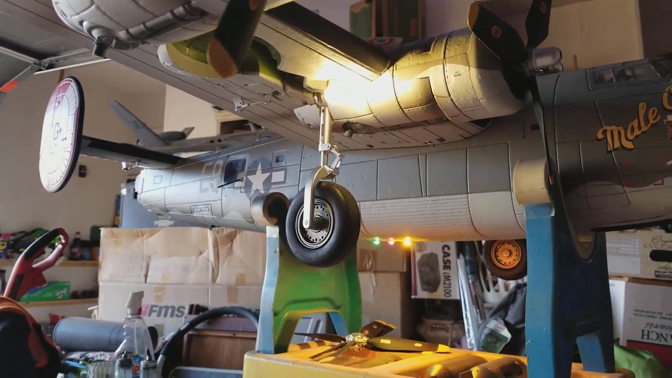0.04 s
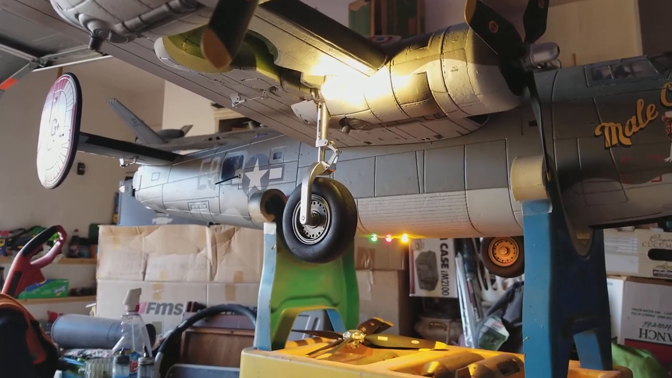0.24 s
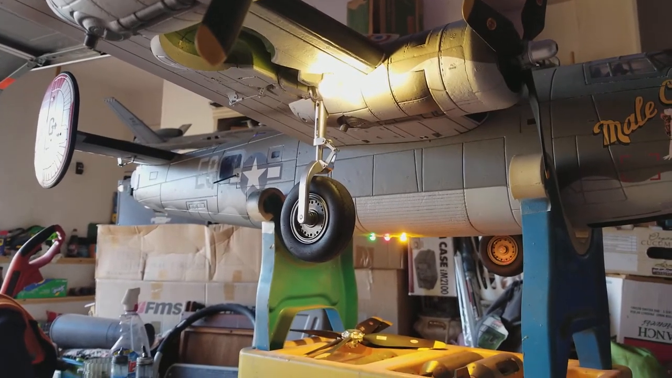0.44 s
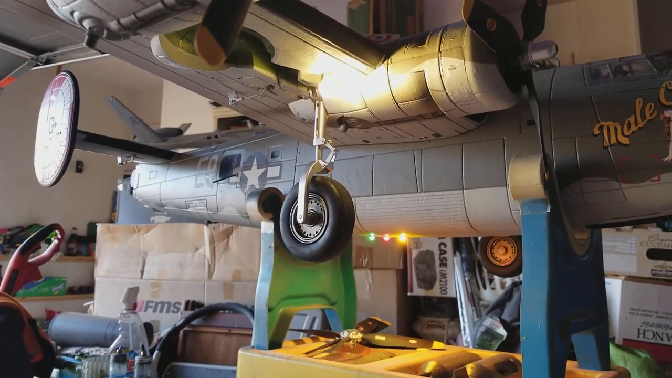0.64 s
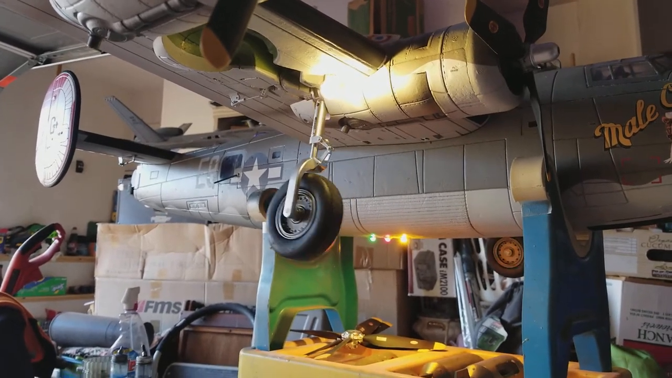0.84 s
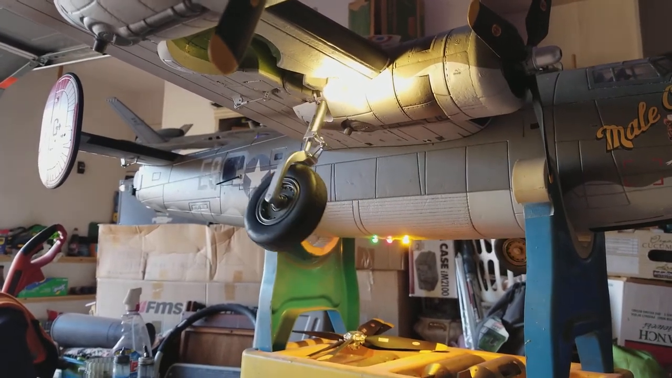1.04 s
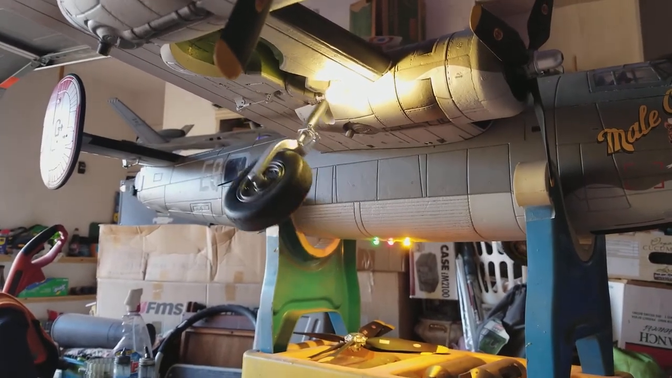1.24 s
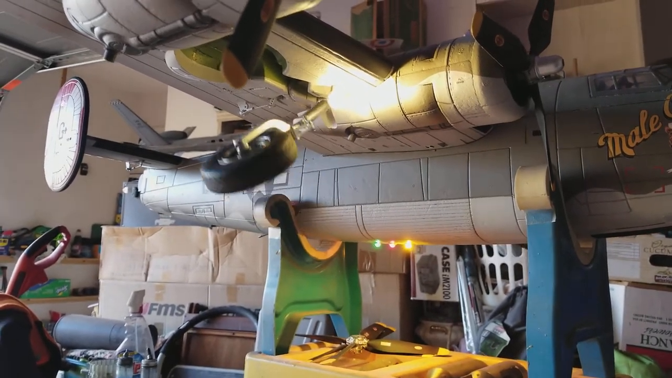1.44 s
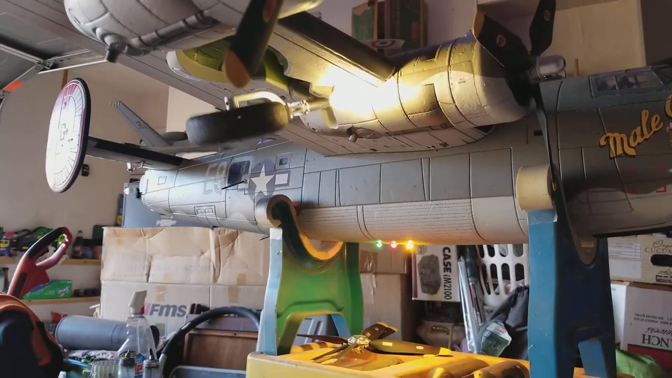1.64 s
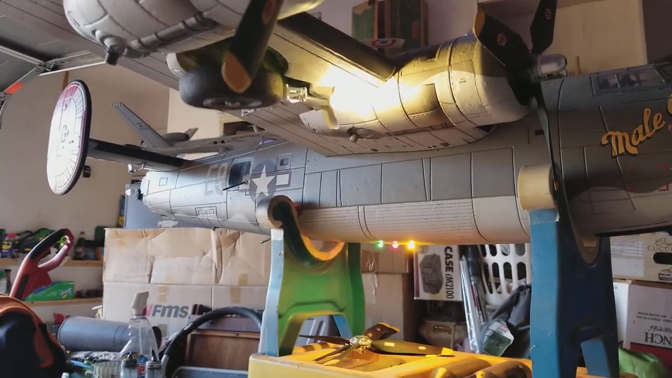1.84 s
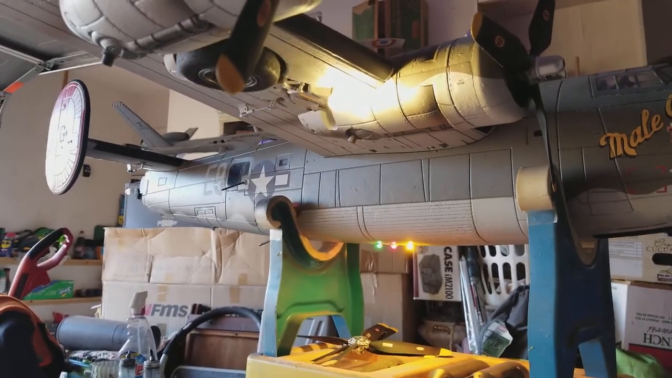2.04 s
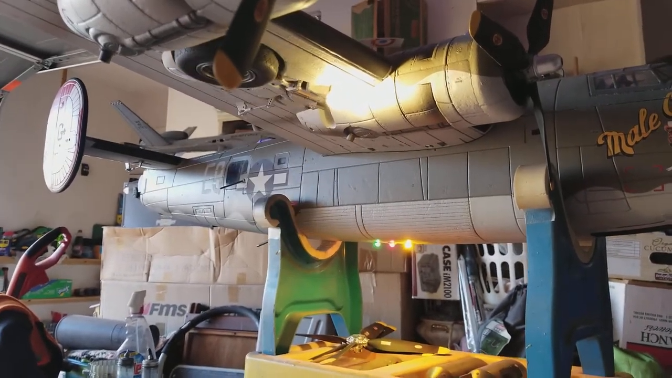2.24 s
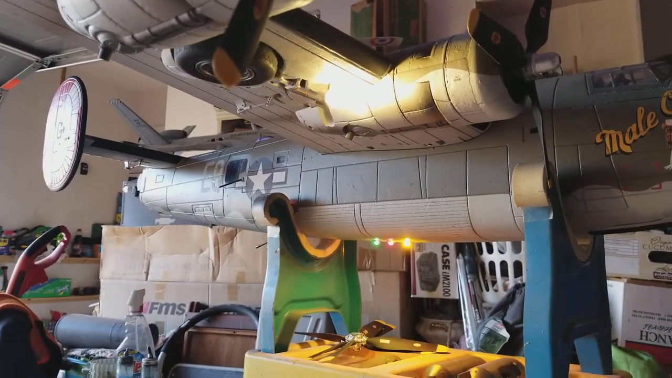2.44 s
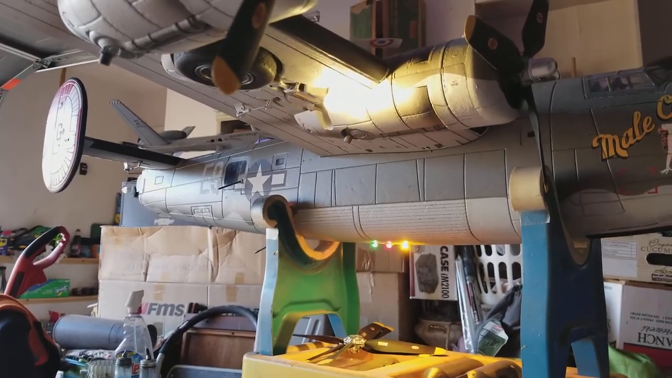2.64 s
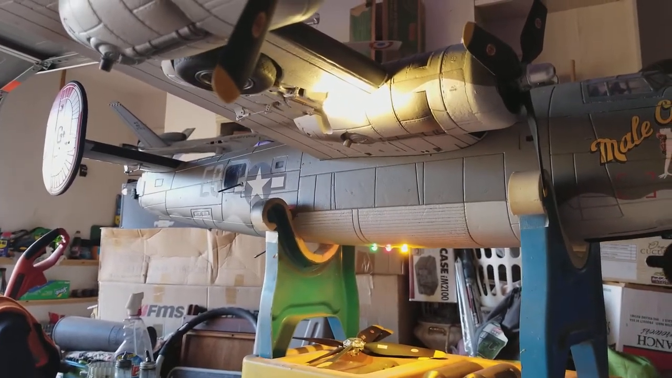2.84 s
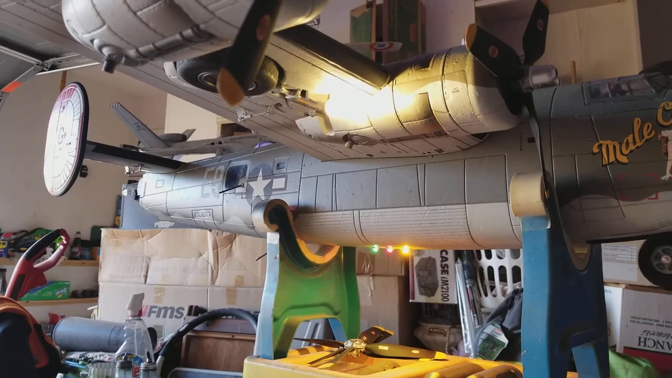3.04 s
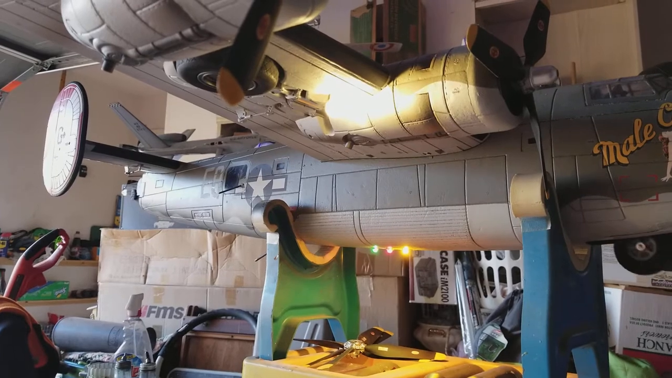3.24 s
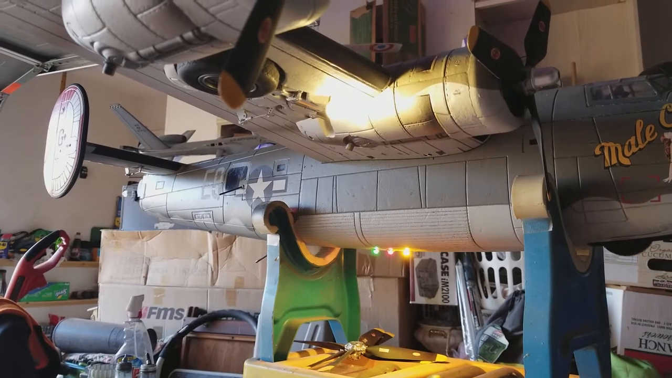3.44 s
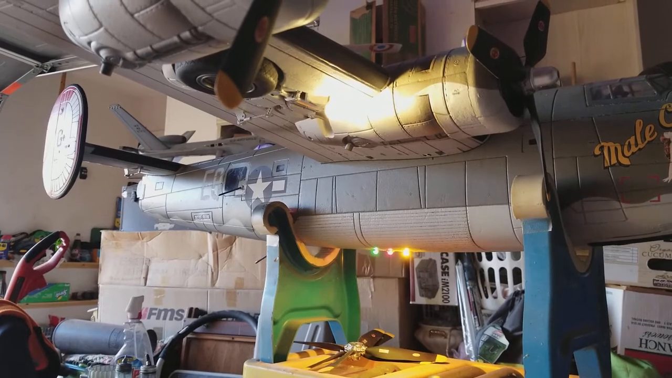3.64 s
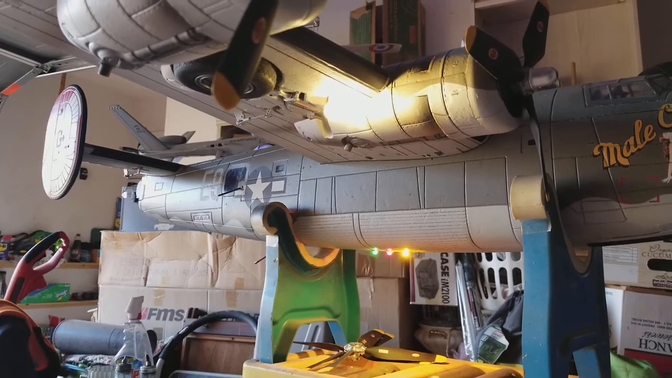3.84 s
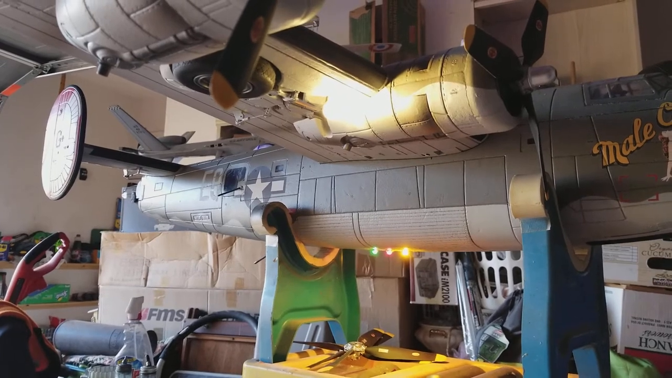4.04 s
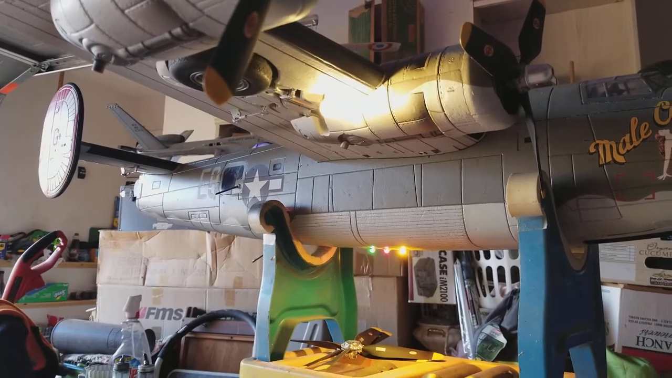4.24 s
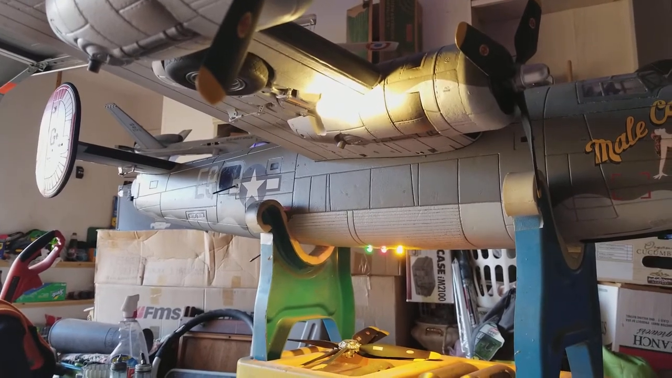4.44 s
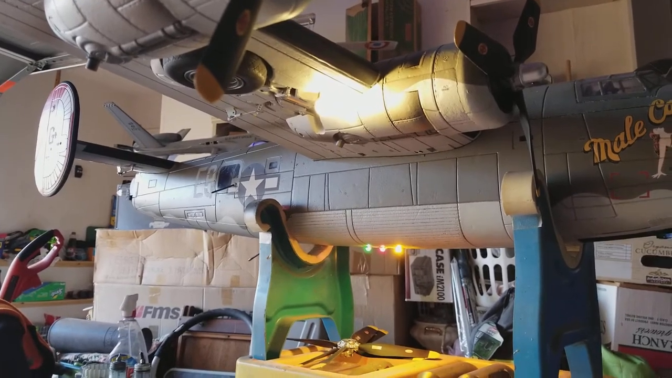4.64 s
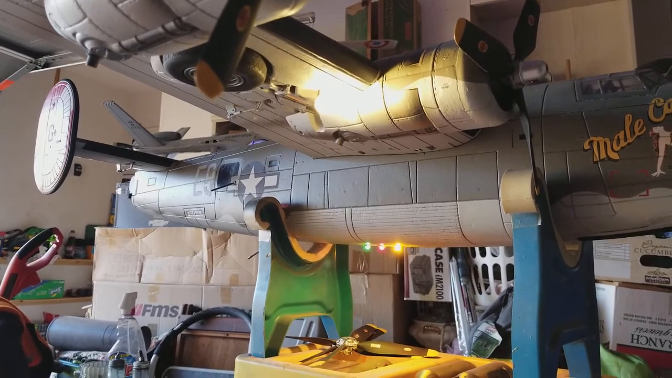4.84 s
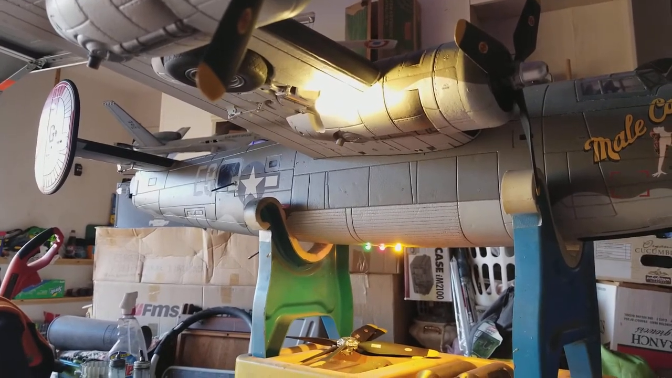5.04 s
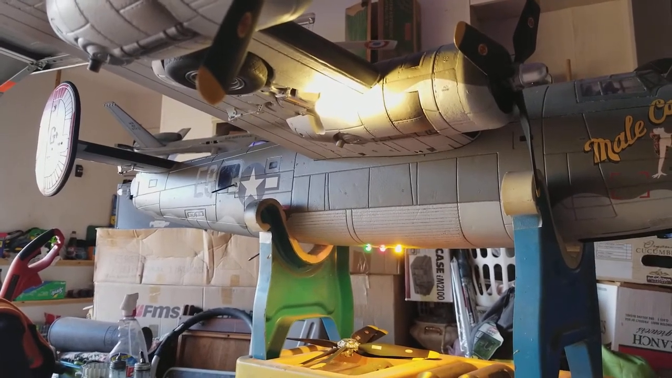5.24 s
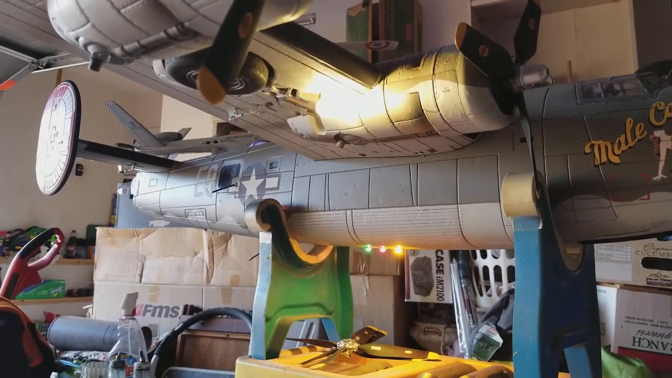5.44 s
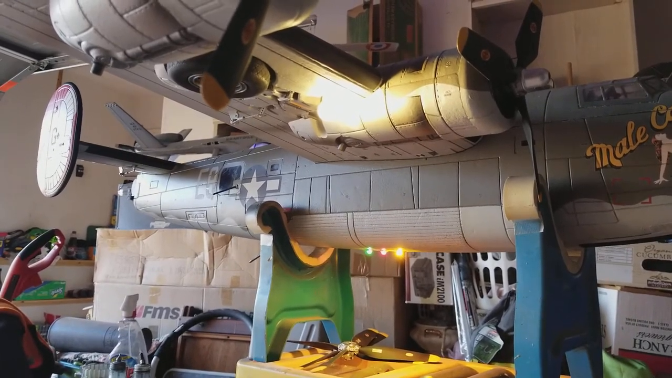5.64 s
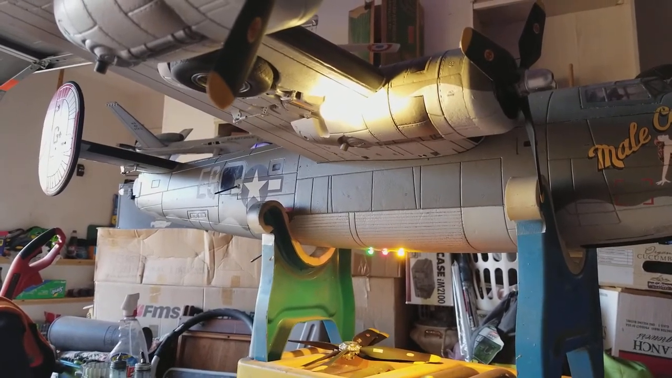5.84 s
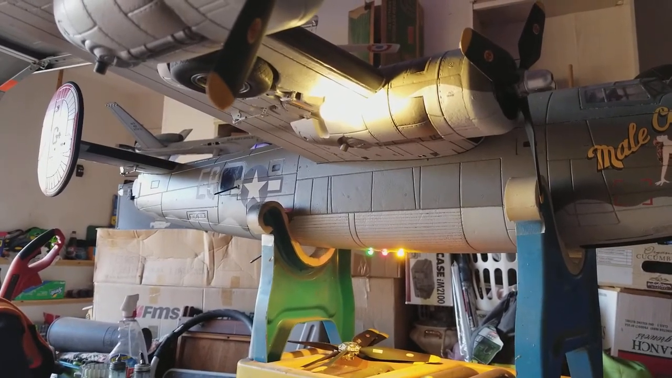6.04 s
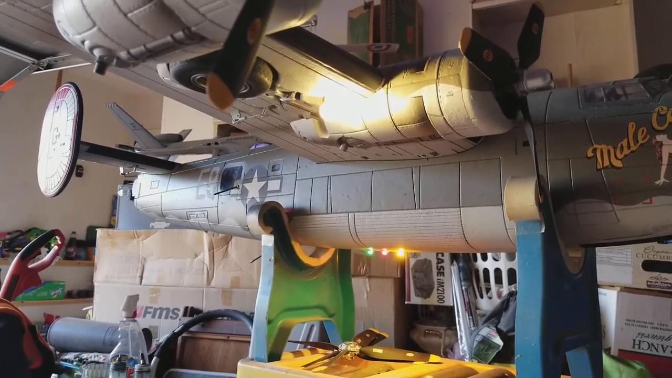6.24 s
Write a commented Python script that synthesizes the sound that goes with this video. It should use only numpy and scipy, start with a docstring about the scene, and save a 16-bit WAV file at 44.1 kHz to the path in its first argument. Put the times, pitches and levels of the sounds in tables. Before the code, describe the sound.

A sharp switch click, then a close small geared motor whirs, strains and buzzes to a stop, followed by two softer motors and a dull knock.

```python
"""Model aircraft legs in a garage

Close to a two-port microphone, small geared motors fold a model aircraft's landing legs; a switch clicks first.
The near motor is tones at multiples of its shaft speed plus gated noise, labouring once per gear turn under load,
with burr ticks, scrapes, squeals and short whimpers. Two farther motors then run together.
Knocks ring decaying modes of the foam airframe, and fading noise makes the garage answer.
Underneath are coloured noise for traffic rumble, far rush and microphone hiss, and a wavering hum."""
import sys
import numpy as np
from scipy import signal
from scipy.fft import rfft, irfft, next_fast_len
from scipy.io import wavfile
from scipy.ndimage import map_coordinates

SR = 44100
rng = np.random.default_rng(int(sys.argv[2]) if len(sys.argv) > 2 else 0)


def wrap_up_sound(samples):
    """Save the sound to the file named by the first command line argument, as 16-bit audio."""
    columns = np.atleast_2d(samples).T
    # keep every value between -1 and 1, then stretch to whole-number steps
    tamed = np.clip(columns, -1, 1)
    steps = np.round(tamed * 32767).astype(np.int16)
    wavfile.write(sys.argv[1], SR, steps)


def ratio(d):
    """dB to gain"""
    e = np.asarray(d, float) / 20
    return 10 ** e


N = 277821
T = np.arange(N) / SR
PORTS = np.array([[.5], [-.5]])  # half of a left-right difference for each microphone port


def along(points, hz):
    """Reads (f/Hz, value) points on a log frequency axis."""
    f, value = np.transpose(points)
    return np.interp(np.log(hz + 1), np.log(f + 1), value)


def curves(rows):
    """One value per sample for each column after the time."""
    s, *columns = np.transpose(rows)
    return [np.interp(T, s, column) for column in columns]


def after(s):
    """Seconds since time s, zero before it."""
    return np.clip(T - s, 0, None)


def wobble(rate):
    """A smooth random curve, rate knots a second."""
    return map_coordinates(rng.standard_normal(int(N * rate / SR) + 4), [T * rate])


def phase(hz):
    """Angle [rad] of a tone or shaft turning at hz."""
    return 2 * np.pi * np.cumsum(hz) / SR


def filtered(x, response):
    """x times a complex response of frequency."""
    m = next_fast_len(N + 8192)
    return irfft(rfft(x, m) * response(np.fft.rfftfreq(m, 1 / SR)), m)[..., :N]


def noise(colour, alike, balance=((1, 0),), lead=((1, 0),), beat=1):
    """Noise at both ports whose middle has rms 1; beat shapes it before the colour."""
    def turn(hz):
        return np.arccos(np.clip(along(alike, hz), 0, 1)) / 2

    def spread(hz):
        return ratio(along(colour, hz)) * [np.cos(turn(hz)), np.sin(turn(hz))]

    def placing(hz):
        return ratio(PORTS * along(balance, hz)) * np.exp(1j * PORTS * along(lead, hz))

    both, apart = filtered(beat * rng.standard_normal((2, N)), spread)
    pair = filtered(np.array([both + apart, both - apart]), placing)
    return pair / np.std(pair.mean(0))


# colour of garage air and distant traffic: (f/Hz, relative level/dB per Hz)
RUMBLE_COLOUR = [(20, -18.5), (65, -3.5), (134, -0.5), (168, -1), (204, -9), (400, -19), (976, -19.5),
                 (1810, -29.5), (3160, -35), (16000, -35.5)]
# course of the low rumble, before its slow wavering: (t/s, level/dB)
RUMBLE_LEVEL = [(0, -60.5), (3.9, -64), (4.3, -67.5), (6.3, -63)]
# likeness of the rumble at the two ports: (f/Hz, likeness 0-1)
RUMBLE_ALIKE = [(60, 0.92), (300, 1), (1500, 0.031)]
# hum: centre f/Hz, centre level/dB
HUM = (154, -65)
# swells of the far rush: (t/s, peak level/dB, time to fall 10 dB either side/s)
RUSH_SWELLS = [(.5, -71, .2), (4.15, -67, .25), (4.87, -71.5, .13), (6.1, -70.5, .35)]
# colour of the far rush: (f/Hz, relative level/dB per Hz)
RUSH_COLOUR = [(700, -15), (1300, -0.5), (1500, -13), (1900, -47.5)]


def background():
    """Low rumble, a wavering hum and microphone hiss, with a far rush that comes and goes."""
    low = filtered(noise(RUMBLE_COLOUR, RUMBLE_ALIKE), lambda hz: hz < 300)
    hiss = filtered(noise(RUMBLE_COLOUR, RUMBLE_ALIKE), lambda hz: hz >= 300)
    hum_hz, hum_db = HUM
    hum = ratio(hum_db + 3.5 * wobble(5)) * np.sin(phase(hum_hz + 3 * wobble(8)))
    hum = hum * (T < 4)
    swell = sum(ratio(db - 10 * abs(T - s) / fall) for s, db, fall in RUSH_SWELLS)
    rush = swell * noise(RUSH_COLOUR, [(1000, .4)])
    rumble = ratio(curves(RUMBLE_LEVEL)[0] + 1.2 * wobble(6)) * low
    return rumble + ratio(-65.5) * hiss + hum + rush


# switch and airframe knocks: (t/s, level/dB, crack level against it/dB, f of the modes nearest the blow/Hz)
KNOCKS = [(.4985, -23, -5, 1100), (.5035, -28, -8, 600), (2.04, -33, -14, 600), (2.708, -15.5, -27, 3000),
          (2.856, -32, -16, 600), (3.9, -38, -15, 800)]
# modes of the foam airframe: (f/Hz, relative level/dB, t60/s)
FRAME_MODES = [(470, -11, .12), (580, -5, .07), (820, -4, .07), (1080, -3, .06), (1180, 0, .05),
               (2800, -7, .04)]


def knocks():
    """Each blow rings mostly the frame modes near where it lands, and adds a short crack."""
    out, t = np.zeros(N + SR), T[:SR // 3]
    for s, db, crack_db, near_hz in KNOCKS:
        ring = np.zeros(len(t))
        for hz, mode_db, t60 in FRAME_MODES:
            reach_db = -15 * abs(np.log2(hz / near_hz))
            mode_db = mode_db + reach_db + rng.normal(0, 1.5)
            ring += ratio(mode_db - 60 * t / t60) * np.sin(2 * np.pi * hz * t)
        onset = 1 - np.exp(-t / 0.00025)
        crack = ratio(crack_db - 60 * t / 0.026) * rng.standard_normal(len(t))
        out[round(s * SR):][:len(t)] += ratio(db) * (ring * onset + crack)
    return out[:N] * ratio([[1.5], [-1.5]])


# decay of the garage: (f/Hz, t60/s)
GARAGE_DECAY = [(1000, .3), (10000, .2)]


def garage(x):
    """Fading noise as the room's answer: each frequency dies at its own speed."""
    hz, t, z = signal.stft(rng.standard_normal((2, SR // 2)), SR, nperseg=256)
    fade = ratio(-60 * t / along(GARAGE_DECAY, hz)[:, None])
    tail = signal.istft(z * fade, SR, nperseg=256)[1]
    late = np.pad(x, (200, 0))[None]  # the answer starts 200 samples late
    return signal.fftconvolve(late, tail / np.linalg.norm(tail[0]), axes=1)[:, :N]


def spin(run):
    """Speed share and tone dB of a motor whose speed settles exponentially and whose tones die at power off."""
    start_speed, start_db, spin_up_s = .6, -18, .02
    slow = np.exp(-after(run[0]) / spin_up_s)
    db = start_db * slow - 1200 * after(run[1])  # tones fall 1200 dB/s at power off
    return 1 - (1 - start_speed) * slow, np.where(T > run[0], db, -120)


def chatter(run):
    """Rattle gain: a quick start, bedding in, coasting, standstill."""
    on, off, db, lower_db, coast, halt = run
    db = db - lower_db * np.exp(-after(on) / .12)  # grows in over .12 s
    db = db - 3.5 * (T > off) - coast * after(off)  # drops as the drive is cut, then coasts
    db = db - 230 * after(halt)  # dies at standstill, dB/s
    return ratio(db) * np.clip(after(on) / .009, 0, 1)


def gear(stages):
    """Angle [rad] of the first gear wheel, 0 at its tight spot."""
    s, rate = np.transpose(stages)
    return phase(np.append(0, rate)[np.searchsorted(s, T)])


# resonances of the wing panels that the tones shake: (f/Hz, width/Hz, lift at the centre/dB)
PANELS = [(328, 50, 8), (915, 55, 6), (2480, 348, 4.5)]


def tones(shaft_hz, db, orders, place, flutter_db):
    """Multiples of the shaft speed, each fluttering and lifted where it crosses a panel resonance."""
    angle, out = phase(shaft_hz), np.zeros((2, N))
    _, balance, lead = place
    for multiple, rel_db in orders:
        hz = multiple * shaft_hz
        lift_db = sum(top / (1 + (2 * (hz - centre) / width) ** 2) for centre, width, top in PANELS)
        size = np.sqrt(2) * ratio(db + rel_db + lift_db + flutter_db * wobble(70))
        usual_hz = np.median(hz[db > db.max() - 15])  # pitch while loud sets the placing
        turning = np.sin(multiple * angle + PORTS * along(lead, usual_hz))
        out += size * ratio(PORTS * along(balance, usual_hz)) * turning
    return out


def loaded(hz, swing, brush_db, tooth_db, turns, orders, place, jitter, throb_db, flutter_db):
    """The tight spot brakes the shaft once a gear turn: the pitch dives and the teeth press harder."""
    wheel, load = gear(turns), np.clip(swing / .05, 0, 1)
    dive = swing * (np.sin(wheel) + .3 * np.sin(2 * wheel))
    hz = hz * (1 - dive + jitter * (.35 + load) * wobble(150))
    press = load * (np.cos(wheel) - 1)
    uneven_db = 1.6 * load * wobble(25)  # no two passes of the tight spot press alike
    brush = tones(hz, brush_db + throb_db[0] * press, orders[0], place, flutter_db)
    tooth = tones(hz, tooth_db + throb_db[1] * press + uneven_db, orders[1], place, flutter_db)
    return brush + tooth, press, hz, load


def rattle(gain, colour, place, hz, press, gate, throb_db):
    """Teeth and brushes chatter: noise gated once a shaft turn, swelling at the tight spot."""
    beat = ratio(gate * np.cos(phase(hz)) + 1.5 * wobble(400))
    swell = ratio(throb_db * press + 0.71 * wobble(30))
    return gain * swell * noise(colour, *place, beat=beat)


# near motor before spin-up, load and overtone offsets: (t/s, shaft f/Hz, speed swing share, tooth level/dB)
NEAR_COURSE = [(.63, 347, 0, -43), (.74, 350, 0, -40), (.78, 330, .003, -41), (1.1, 328.5, .003, -32),
               (1.325, 326, .015, -32), (1.365, 288, .04, -25), (1.41, 277, .048, -21),
               (1.5, 271, .086, -26), (1.66, 272, .1, -25.5), (1.75, 291, .045, -28), (1.94, 291, .06, -25),
               (2.05, 304, .05, -29), (2.13, 316, .006, -35), (2.215, 297, .015, -33),
               (2.255, 309, .013, -37.5)]
# its brush tone before the same offsets: (t/s, level/dB)
NEAR_BRUSH_COURSE = [(.8, -52.5), (1.1, -49), (2.15, -50), (2.21, -43), (2.255, -46)]
# its first gear wheel, starting at the tight spot: (from t/s, turns per s)
NEAR_TURNS = [(.6183, 32.8), (1.35, 31.75), (1.413, 23.95), (1.747, 28.28)]
# its power on t/s, power off t/s, base rattle level/dB, cut at first/dB, coasting loss/dB per s, standstill t/s
NEAR_RUN = (.573, 2.255, -30, 5, 165, 2.34)
# its brush and tooth overtones: (multiple of the shaft, level against the family/dB)
NEAR_BRUSH = [(1, -17), (3, 5)]
NEAR_TOOTH = [(9, 1)]
# colour of its rattle: (f/Hz, relative level/dB per Hz)
NEAR_COLOUR = [(200, -50.5), (400, -21), (1000, -8.5), (1350, -14), (1750, -9), (1900, 1.5), (2100, -7.5),
               (2960, 1.5), (3710, -5), (4400, -5), (7900, -6.5), (8500, -15), (10000, -20), (13200, -11),
               (16000, -18)]
# its place before the ports: (f/Hz, likeness 0-1), (f/Hz, left minus right level/dB), (f/Hz, left lead/rad)
NEAR_PLACE = [(500, .8), (3000, .5), (15000, .3)], [(500, 1), (1030, -2.5), (5500, 4), (7500, -2),
              (10000, 0), (13000, 11.5)], [(900, 1.5), (1900, -1.1), (2500, 1.08), (3000, 2.5),
              (4300, 1.18)]


def near_motor():
    """The motor close to the microphone: shaft tones, and rattle with the scraping of its gearbox."""
    hz, swing, tooth_db = curves(NEAR_COURSE)
    brush_db, = curves(NEAR_BRUSH_COURSE)
    speed, on_db = spin(NEAR_RUN)
    whine, press, hz, load = loaded(hz * speed, swing, brush_db + on_db, tooth_db + on_db, NEAR_TURNS,
                                    (NEAR_BRUSH, NEAR_TOOTH), NEAR_PLACE,
                                    jitter=.0075, throb_db=(1.5, 7), flutter_db=1.5)
    wheel = gear(NEAR_TURNS)
    scrape = ratio(on_db) * (shell(wheel, load) + squeal(wheel, load)) + burr(wheel)
    chattering = rattle(chatter(NEAR_RUN), NEAR_COLOUR, NEAR_PLACE, hz, press, gate=1.5, throb_db=0.37)
    return whine, scrape + chattering


# colour of the burr's tick: (f/Hz, relative level/dB)
BURR_COLOUR = [(7000, -30), (11000, -6), (13500, 0), (16000, -3)]


def burr(wheel):
    """A burr on the near wheel: one bright tick of random size each turn, mostly on the left port."""
    lead_turns = .14  # ahead of the tight spot
    ticks = np.diff(np.floor(wheel / (2 * np.pi) + lead_turns), prepend=0) > 0
    size = ticks * ratio(-15.5 + 4 * rng.standard_normal(N)) * (T < NEAR_RUN[1])
    return filtered(size, lambda hz: ratio(along(BURR_COLOUR, hz))) * ratio([[3.8], [-7]])


# gearbox shell, rung as the tight spot engages: (f/Hz, width/Hz, level at full load/dB, lead on the spot/rad)
SHELL_MODES = [(4490, 320, -36, -1.2), (7400, 1000, -35, 1.1), (11000, 900, -44, 1.1)]


def shell(wheel, load):
    """A short noisy scrape in each resonance of the gearbox shell, once a gear turn."""
    out = 0
    for hz, width, db, lead in SHELL_MODES:
        colour = [(hz - 2 * width, -40), (hz - width / 2, -6), (hz, 0),
                  (hz + width / 2, -6), (hz + 2 * width, -40)]
        ring = noise(colour, *NEAR_PLACE)
        out = out + load * ratio(db + 9 * (np.cos(wheel + lead) - 1) + 1.5 * wobble(20)) * ring
    return out


# gear tooth squealing at the tight spot: (t/s, centre f/Hz, glide either side/Hz, minus = falling)
SQUEAL_COURSE = [(1.34, 5600, -350), (1.43, 5270, -50), (1.57, 5600, 250), (1.68, 5780, -100),
                 (1.81, 5330, -250), (1.89, 5720, -300), (1.99, 5300, -200), (2.03, 5650, -300),
                 (2.08, 5450, -350)]


def squeal(wheel, load):
    """A short chirp once a gear turn, roughened in pitch and level so that no two are alike."""
    lead = 1.1  # on the tight spot, rad
    centre, glide = curves(SQUEAL_COURSE)
    hz = centre + glide * np.sin(wheel + lead) + 150 * wobble(500)
    db = -28 + 7.5 * (np.cos(wheel + lead) - 1) + 2 * wobble(25)
    return load * tones(hz, db, [(1, 0)], NEAR_PLACE, flutter_db=3.5)


# short squeaks as a leg reaches its stop: (t/s, length/s, first f/Hz, last f/Hz, peak level/dB)
WHIMPERS = [(2.165, .04, 1290, 1260, -43), (2.225, .04, 1200, 1290, -41), (2.255, .075, 1140, 1080, -42),
            (3.915, .05, 510, 415, -48)]


def whimpers():
    """A brief gliding tone under a soft arch."""
    out = 0
    for s, length, first_hz, last_hz, db in WHIMPERS:
        u = np.clip((T - s) / length, 0, 1)
        arch = np.sqrt(np.abs(np.sin(np.pi * u))) * (u < 1)
        out = out + ratio(db) * arch * np.sin(phase(first_hz + (last_hz - first_hz) * u))
    return out


# even far motor before spin-up, pulsing and overtone offsets: (t/s, shaft f/Hz, tooth level/dB)
EVEN_COURSE = [(2.46, 333, -62), (2.7, 335, -60), (2.75, 306.6, -50), (3.13, 324, -48), (3.2, 307, -40),
               (3.36, 299, -38.5), (3.5, 308, -42), (3.67, 316, -50), (3.79, 326.5, -50),
               (3.9, 329.5, -48.5)]
# labouring far motor before load and overtone offsets: (t/s, brush level/dB, tooth level/dB)
LABOUR_COURSE = [(2.72, -43, -65), (2.8, -39, -65), (2.95, -43.5, -65), (3.45, -44.5, -58),
                 (3.54, -41, -46), (3.72, -39, -40), (3.76, -48, -55), (3.89, -52, -65)]
# first gear wheel of the labouring motor, starting at its tight spot: (from t/s, turns per s)
FAR_TURNS = [(2.718, 28.0)]
# power on t/s, power off t/s, base rattle level/dB, cut at first/dB, coasting loss/dB per s, standstill t/s
EVEN_RUN = (2.364, 3.9, -38, 1, 60, 4.04)
LABOUR_RUN = (2.705, 3.9, -39, 0, 350, 4.0)
# shaft, brush and tooth overtones: (multiple of the shaft, level against the family/dB)
FAR_SHAFT = [(1, -1), (4, -1)]
FAR_BRUSH = [(3, 4.5), (12, -4)]
FAR_TOOTH = [(9, 0.5)]
# colours of the even and the labouring rattle: (f/Hz, relative level/dB per Hz)
EVEN_COLOUR = [(300, -27), (640, -19), (950, -8), (1200, -14), (1680, -15), (2700, -4), (4300, -11),
               (7600, -17), (9300, -30), (11900, -21), (15900, -25)]
LABOUR_COLOUR = [(300, -31), (640, -22), (900, -8), (1080, -16), (1700, -13), (2700, -3.5), (3050, -15),
                 (3340, 3), (3480, -6), (4310, -13), (6500, -12.5), (7200, -18), (8100, -7), (9040, -35),
                 (12000, -27), (16000, -32)]
# their place before the ports: (f/Hz, likeness 0-1), (f/Hz, left minus right level/dB), (f/Hz, left lead/rad)
FAR_PLACE = [(500, .8), (4300, 0.36), (9000, .2)], [(500, -1.5), (4000, -4), (15000, 1)], [(100, 1.5),
             (860, -1.36), (1900, -2), (2900, -6.5), (4300, -8.5), (8000, -18)]


def far_motors():
    """Two farther motors, one even, one labouring; the even one's teeth pulse a little with the other's load."""
    hz, tooth_db = curves(EVEN_COURSE)
    speed, on_db = spin(EVEN_RUN)
    brush2_db, tooth2_db = curves(LABOUR_COURSE)
    _, on2_db = spin(LABOUR_RUN)
    speed_ratio, swing = .895, .035  # labouring over even speed (one battery feeds both), speed swing share
    labouring, press, *_ = loaded(speed_ratio * hz, swing, brush2_db + on2_db, tooth2_db + on2_db, FAR_TURNS,
                                  (FAR_BRUSH, FAR_TOOTH), FAR_PLACE,
                                  jitter=.003, throb_db=(6.5, 4), flutter_db=1.8)
    hz = hz * speed * (1 + .0045 * wobble(90))
    pulse_db = 7 * (press + .7)  # .7 centres the pulsing on zero
    even = tones(hz, -55 + on_db, FAR_SHAFT, FAR_PLACE, flutter_db=1.3)
    even = even + tones(hz, -53 + on_db, FAR_BRUSH, FAR_PLACE, flutter_db=1.8)
    even = even + tones(hz, tooth_db + on_db + pulse_db, FAR_TOOTH, FAR_PLACE, flutter_db=3)
    steady = rattle(chatter(EVEN_RUN), EVEN_COLOUR, FAR_PLACE, hz, press, gate=1.5, throb_db=.3)
    throbbing = rattle(chatter(LABOUR_RUN), LABOUR_COLOUR, FAR_PLACE, speed_ratio * hz, press,
                       gate=1.5, throb_db=3.5)
    return even + labouring, steady + throbbing


def scene():
    """Whines, knocks and whimpers ring in the garage over rattle and background."""
    near, near_rattle = near_motor()
    far, far_rattle = far_motors()
    hits = knocks() + whimpers()
    wet = ratio(-8) * near + ratio(-8) * far + ratio(-7) * hits
    answer = garage(filtered(wet.mean(0), lambda hz: hz / (hz + 400)))  # the room returns less bass
    return near + far + hits + answer + near_rattle + far_rattle + background()


def roll_off(x):
    """The treble ends steeply here."""
    return signal.sosfilt(signal.butter(12, 16890, fs=SR, output="sos"), x)


def record(dry):
    """The camera keeps nothing above its band limit."""
    limited = filtered(dry, lambda hz: hz < 15760)
    return roll_off(limited)


dry = scene()
out = record(dry)
wrap_up_sound(out)
```